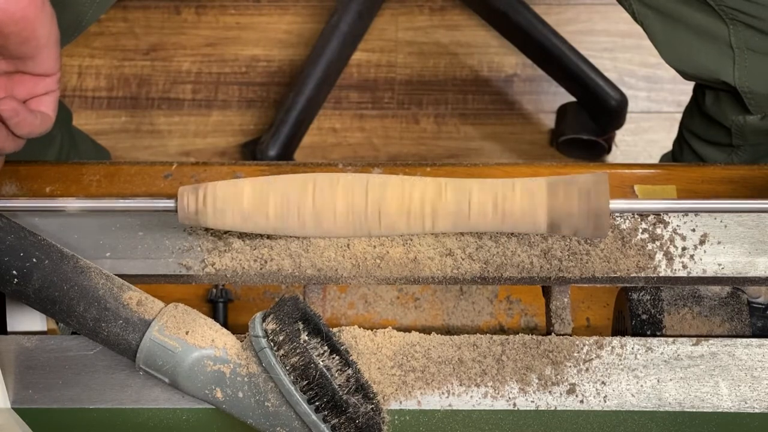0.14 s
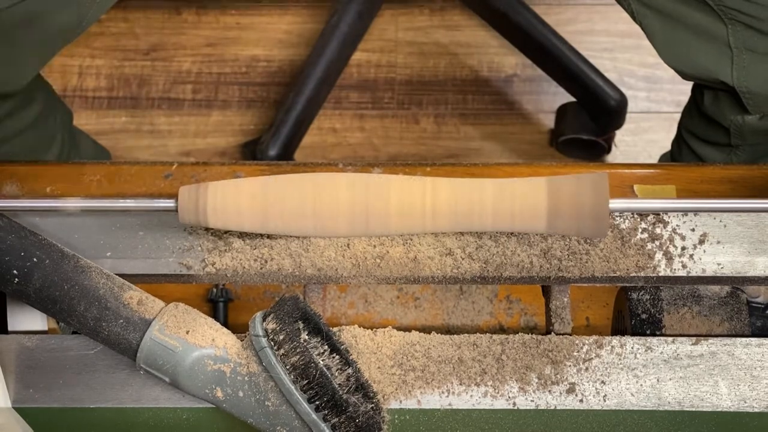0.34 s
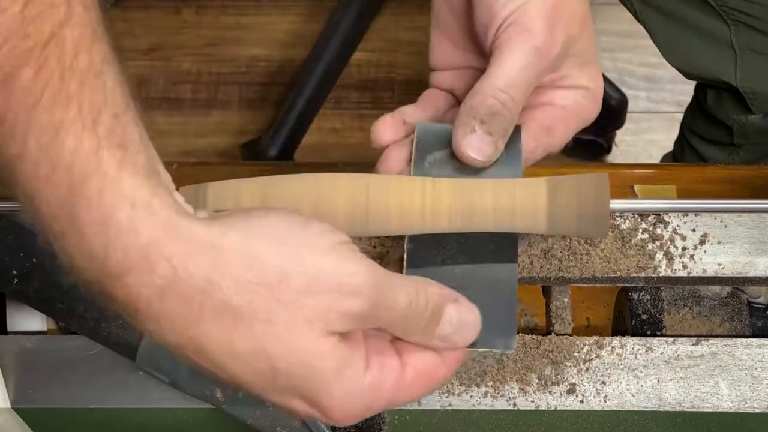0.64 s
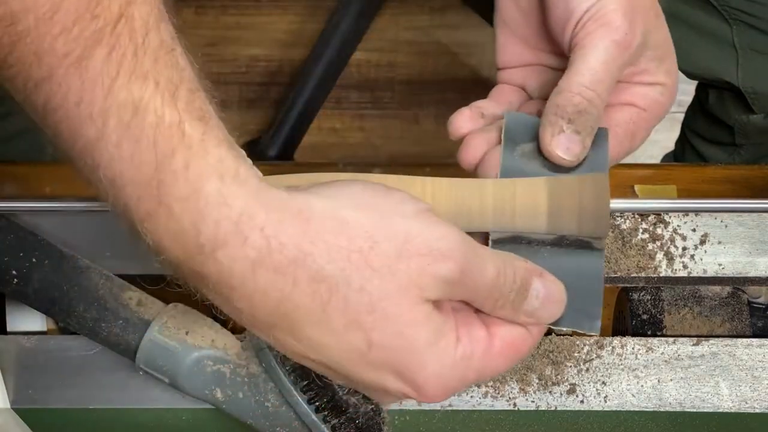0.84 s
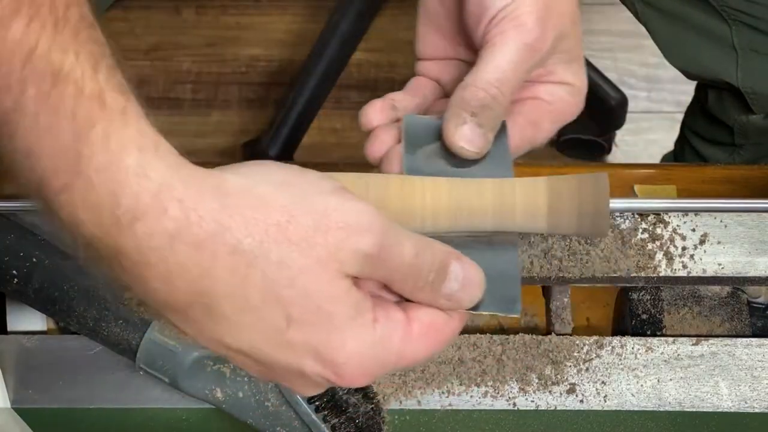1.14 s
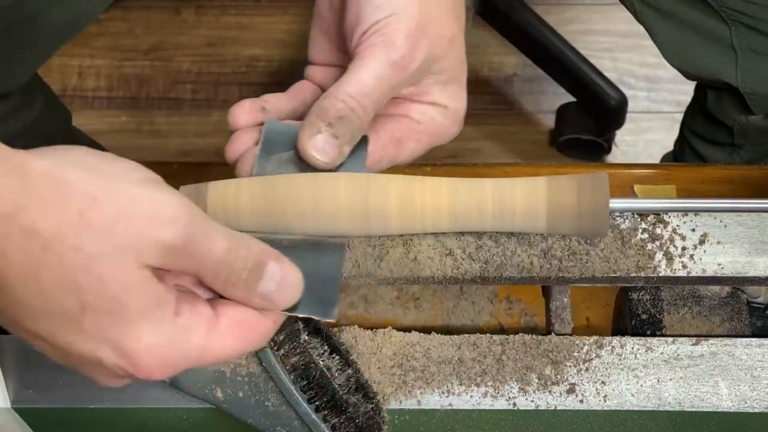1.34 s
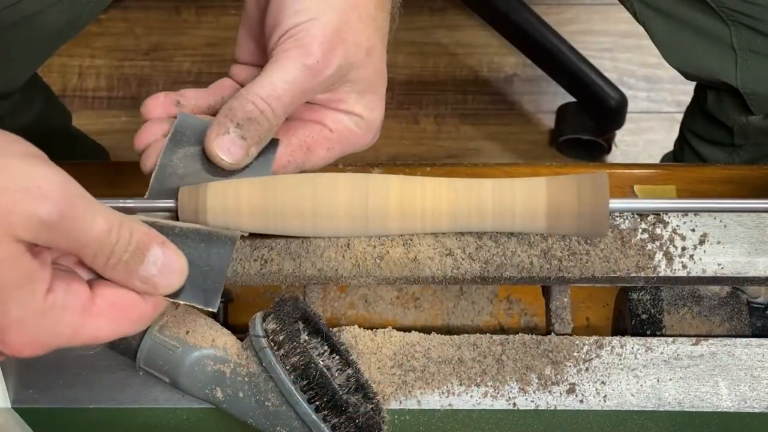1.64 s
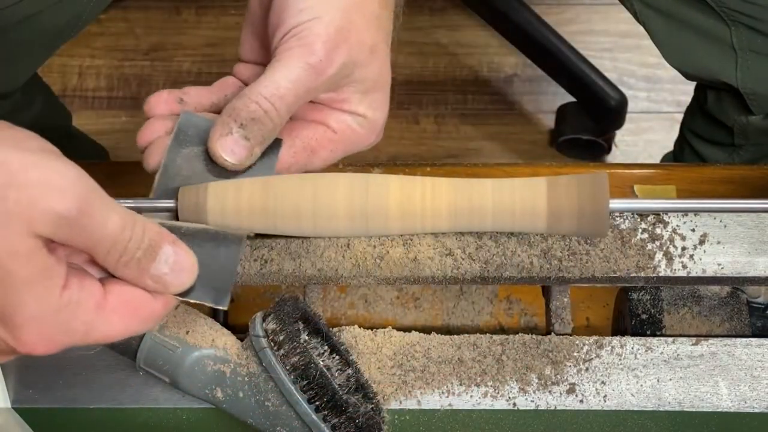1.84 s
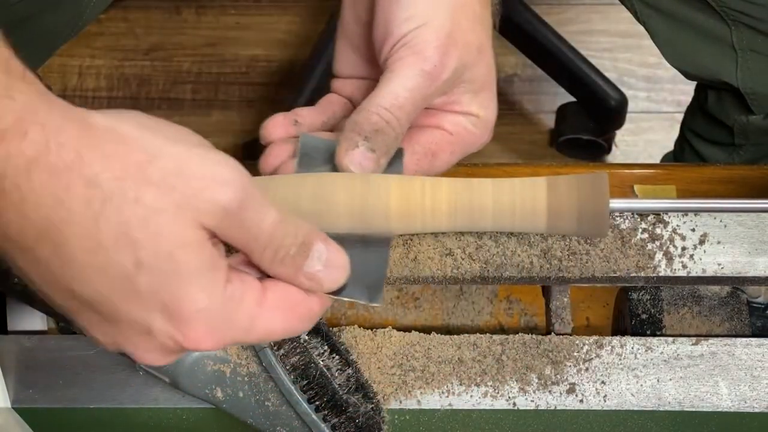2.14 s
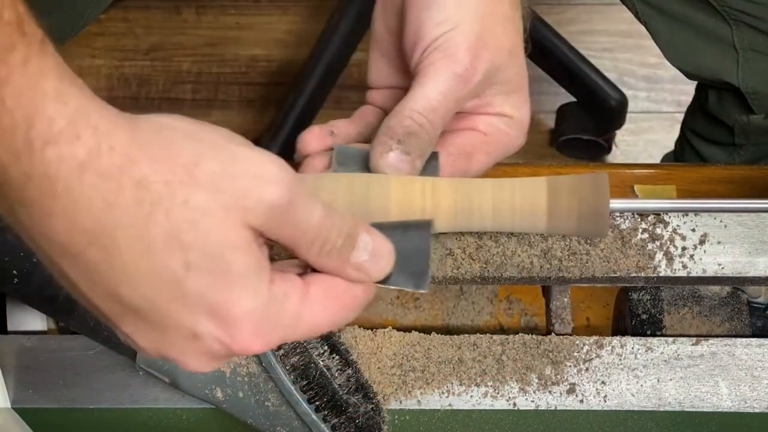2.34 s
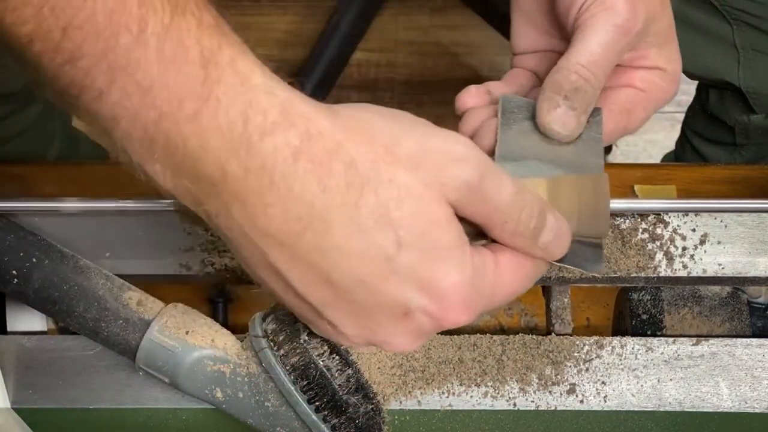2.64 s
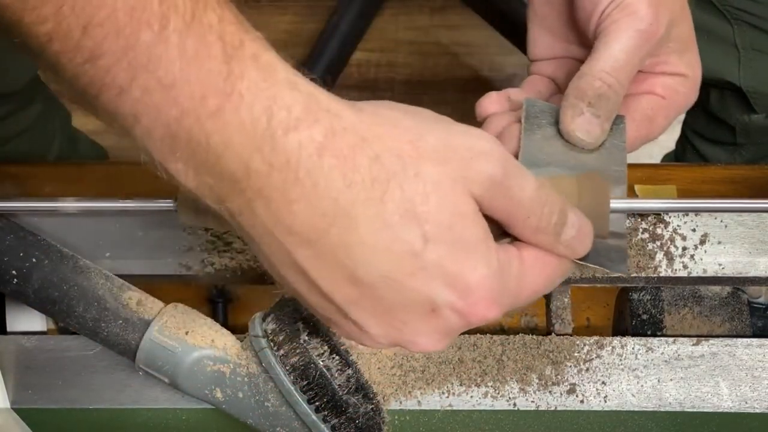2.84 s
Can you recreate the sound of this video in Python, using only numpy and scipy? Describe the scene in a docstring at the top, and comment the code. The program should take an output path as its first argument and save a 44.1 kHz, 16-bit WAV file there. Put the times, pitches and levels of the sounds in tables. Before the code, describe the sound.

A small lathe clunks on and whirs steadily, then sandpaper hisses on the spinning cork

```python
"""A small bench lathe runs in a quiet workshop: noise and bearing knocks ring its metal body.
A clunk of the switch starts it and it spins up in about a tenth of a second.
The motor adds a sine hum that dips in pitch, a shaft rumble and a thin whine of narrow noise.
Two wavering sine tones sing from the drive.
Sandpaper on the spinning cork hisses as shaped noise, close to a two-port microphone."""
import sys
import numpy as np
from scipy import signal
from scipy.fft import rfft, irfft
from scipy.io import wavfile
from scipy.ndimage import map_coordinates

SR = 44100
rng = np.random.default_rng(int(sys.argv[2]) if len(sys.argv) > 2 else 0)


def inscribe(sig):
    """Save sig as 16-bit PCM at rate SR to the path in sys.argv[1].

    A 1-D sig is mono; a 2-D sig holds one channel per row.
    Samples are clipped to [-1, 1] before scaling.
    """
    pcm = np.round(np.clip(np.atleast_2d(sig).T, -1, 1) * 32767)
    wavfile.write(sys.argv[1], SR, pcm.astype(np.int16))


N = 132300  # three seconds

# Still room, spectrum shape: pitch_hz, level_db (per Hz)
ROOM_SPECTRUM = [(30, -21), (150, -15), (500, -8.5), (1000, -31), (4000, -38), (15000, -59)]
ROOM_DB = -75

# Knocks of switch and drive: start_s, thud_db, crack_db, pitch_hz
SWITCH_KNOCKS = [(.0956, -26.5, -63, 490), (.1146, -7, -26.5, 463), (.1229, -32, -30.5, 523),
                 (.1555, -17.5, -70, 360), (.1635, -22, -70, 340), (.169, -16.5, -58, 590),
                 (.1905, -14, -60, 560), (.2015, -16.5, -54, 666), (.2095, -14.5, -50, 610),
                 (.3025, -19.5, -42, 490), (.329, -33, -60, 524)]
# Ringing modes of the housing: pitch_hz, level_db (relative), t60_s
HOUSING_MODES = [(365.5, -3, 0.054), (456, 12.5, 0.015), (570, -2.5, 0.027), (850, 10, 0.034)]
# Snap of the switch, spectrum shape: pitch_hz, level_db (per Hz)
CRACK_SPECTRUM = [(40, -5), (200, 13.5), (600, 3), (1300, -6), (2200, -10.5), (5500, -15.5), (8000, -10.5),
                  (11000, -14), (15500, -49)]
PUSH_S, SNAP_S = .0034, 0.00086  # rise times of thud and crack
CRACK_T60_S, TAIL_DB, TAIL_T60_S = 0.034, -15, 0.28
THUD_LOW_HZ, THUD_HIGH_HZ = 275, 690  # the housing radiates only this band
FOCUS_DB = 49  # loss of a housing mode an octave from the pitch of a knock

START_S, SPIN_UP_S = .135, .115
BEARING_HZ, BEARING_WANDER = 140.94, .014  # rate at full speed, wander as a share of it
KNOCK_SHARE, GATE_DEPTH = 0.26, 0.25  # knocks against noise, swell of the noise per knock
SHAKE_HZ = 36  # throb of the body at full speed
# Body resonances: pitch_hz, width_hz (each pass), level_db (relative), throb_depth (0-1),
# side_db (relative to mid), pan_db (left minus right)
BODY_RESONANCES = [(57.5, 46, -11, 0.2, -22, -2.5), (126.6, 40, -9, 0.55, -17, -1.5),
                   (269, 96, -9.5, 0.25, -21, -4.5), (529.6, 62, -5, 0, -15.5, -2),
                   (617, 123, -3.5, 0.06, -16, -1.5), (852.5, 147, -7.5, 0, -9.5, -5),
                   (1025, 85, -9.5, 0.02, -6.5, 0), (1115, 124, -4, 0.2, -3.5, 7.5),
                   (1521.4, 136, -9, 0.55, -2, -11), (1670, 203, -5.5, 0, -13.5, 2),
                   (2174, 80, -13.5, 0.34, -30, 0.5), (2394, 204, -3.5, 0.02, -40, 0),
                   (2528, 104, -11.5, 0, -27, 0.5), (2826, 140, -18, 0, -38, 1),
                   (3024, 136, -17, 0.2, -33, -1.5)]
# Broad rattle of the running lathe, spectrum shape: pitch_hz, level_db (per Hz)
RATTLE_SPECTRUM = [(25, -21), (100, -1), (170, 0), (350, -3), (750, -13), (1000, -3), (1300, -23.5),
                   (2000, -17), (2700, -18), (3300, -19.5), (3900, -24), (5300, -23.5), (6700, -25.5),
                   (8000, -23), (8300, -43), (9600, -21), (12500, -38), (15500, -48)]
BODY_DB, RATTLE_DB = -40, -39.5
# The run-up wakes ever higher resonances
REACH_HZ, REACH_POWER, REACH_ORDER = 3470, 2.3, 4.6
# Slight level drift of the lathe under the paper: time_s, level_db
LOAD_DRIFT = [(.6, 0), (.9, 0), (1.3, 0.35), (2.0, .5), (2.499, 0.26), (3.0, -0.4)]

# Course of the hum: time_s, pitch_hz
HUM_PITCH = [(.22, 163.7), (.26, 162.6), (.315, 130), (.37, 162.4), (.5, 164.2), (.54, 131), (.59, 130),
             (.64, 154.4), (.69, 135.3), (.77, 164.3), (.99, 164.1), (1.03, 147.3), (1.1, 171),
             (1.16, 168.3), (1.22, 156.8), (1.391, 163), (1.68, 164.1), (1.73, 146.8), (1.77, 162.6),
             (2.02, 161), (2.1, 167.9), (2.18, 156), (2.23, 134.5), (2.29, 164), (2.359, 146.7),
             (2.42, 164.3), (2.51, 165), (2.59, 148), (2.639, 166.7), (2.89, 160.7), (2.95, 134),
             (3.0, 156)]
HUM_DB, HUM_DB_PER_HZ, HUM_FLUTTER_DB = -41, 0.06, 0.96
HUM_WANDER, HUM_THROB = 0.0099, .1  # share of pitch, share of loudness
SHAFT_HZ, SHAFT_DB, SHAFT_SWELL_S = 29.18, -49.5, 0.2
# Whine of the motor: pitch_hz, width_hz (each pass), level_db
WHINE_BANDS = [(5300, 310, -61), (7630, 1500, -56.5), (8040, 25, -60)]
LEAN_DB = -2  # left minus right: the low end sits a little to the right

# Two strands that the drive sings: time_s, low_hz, low_db, high_hz, high_db
SINGING_STRANDS = [(0.299, 1090, -62, 1542, -58), (0.601, 1102, -50, 1530, -48),
                   (.95, 1087, -51.5, 1516, -50.5), (1.281, 1090, -47, 1515, -47),
                   (1.421, 1132, -47.5, 1488, -53), (1.751, 1123, -46, 1505, -47),
                   (2.351, 1079, -45.5, 1506, -60), (2.478, 1142, -42.5, 1512, -48),
                   (2.6, 1087, -48, 1492, -52), (2.75, 1120, -46, 1520, -45.5), (3.0, 1080, -50, 1530, -52)]
STRAND_WANDER, STRAND_FLUTTER_DB = .007, 1.5
STRAND_PAN_DB = -0.5  # left minus right

# Paper on the cork: time_s, fine_hiss_db, coarse_rasp_db
PAPER_PRESS = [(.2, -108, -107), (.62, -57, -69), (.64, -52, -46.5), (.77, -43.5, -43.5),
               (0.901, -43, -47.5), (1.04, -45, -50), (1.12, -42.5, -42.5), (1.199, -41.5, -47.5),
               (1.42, -43, -45), (1.73, -50.5, -55), (1.78, -41.5, -47), (1.86, -49, -52.5),
               (1.96, -44, -46.5), (2.2, -47, -51), (2.43, -49, -49.5), (2.541, -46, -46.5),
               (2.75, -47, -50), (3.0, -49, -48.5)]
# Hiss of the fine grit, spectrum shape: pitch_hz, level_db (per Hz)
FINE_SPECTRUM = [(3000, -34.5), (6500, -26), (8050, 1), (8250, -17.5), (8800, -4.5), (9500, -2),
                 (11000, -11), (12300, -20), (13200, -40), (15500, -16)]
# Rasp of the coarse grit, spectrum shape: pitch_hz, level_db (per Hz)
COARSE_SPECTRUM = [(800, -5), (2000, -8), (3800, -1.5), (5200, -5.5), (5900, -1), (7000, -2.5), (8000, 6),
                   (8250, -18), (10000, 1), (13000, -19)]
GRAIN_DB, GRIT_FLICKER_DB, GRIT_THROB = 1.5, 1, 0.1
# Resonances of the paper strip: time_s, low_hz, low_db, mid_hz, mid_db, top_db
PAPER_RESONANCES = [(.2, 4576, -125, 6700, -125, -125), (.6, 4570, -90, 6700, -90, -95),
                    (.66, 4590, -65, 6800, -56.5, -72), (0.779, 4900, -60, 6950, -48, -64),
                    (1.05, 4700, -66, 6950, -49.5, -68), (1.28, 4480, -55, 7250, -52, -55),
                    (1.46, 5300, -53.5, 7350, -56, -58), (1.65, 5212, -59, 7300, -52, -55),
                    (1.85, 5000, -58, 7200, -59, -58), (1.98, 4850, -53.5, 7200, -66, -54),
                    (2.35, 5230, -58, 7000, -55, -56), (2.599, 5660, -59, 7000, -49, -68),
                    (3.0, 5460, -73, 6900, -55.5, -74)]
SCRAPE_WIDTH_HZ, SCRAPE_TOP_HZ = 880, 10950

# Difference between the microphone ports: pitch_hz, side_minus_mid_db
PORT_DIFFERENCE = [(60, -19), (700, -15), (1300, 0), (2100, -18), (3800, -25), (5000, -6), (7200, -18),
                   (7900, -10), (8300, 13.5), (9500, 6), (10800, -16), (12000, 0), (13200, 3), (15000, 4)]
DIFFUSE_DB = -17  # share that arrives off the bench and walls, unlike on the two sides
TOP_HZ = 15750


def undb(db):
    """Decibels to gain."""
    return 10 ** (np.asarray(db) / 20)


def unit(x):
    """Scale to rms 1."""
    return x / np.sqrt(np.mean(x ** 2))


def follow(t, table):
    """Each column after the time column as a course of straight lines in time."""
    at, *columns = np.array(table, float).T
    return [np.interp(t, at, column) for column in columns]


def curve(points):
    """Gain on every frequency bin, drawn through (Hz, dB) points on a log pitch scale."""
    hz, db = np.array(points, float).T
    bins_hz = np.arange(N // 2 + 1) * SR / N
    return undb(np.interp(np.log(bins_hz + 1), np.log(hz), db))


def colour(x, points):
    """Give a sound a spectrum, at rms 1."""
    return unit(irfft(rfft(x) * curve(points), N))


def ring(x, hz, width_hz):
    """A steep resonance from two passes of one peak filter, at rms 1."""
    b, a = signal.iirpeak(hz, hz / width_hz, fs=SR)
    once = signal.lfilter(b, a, x)
    return unit(signal.lfilter(b, a, once))


def walk(rate):
    """Smooth random course of rms 1 through `rate` random points a second."""
    knots = rng.standard_normal(1024)
    return unit(map_coordinates(knots, [np.arange(N) / SR * rate], order=3, mode="wrap"))


def wave(hz):
    """A sine that follows a moving pitch."""
    return np.sin(2 * np.pi * np.cumsum(hz) / SR)


def glide(hz):
    """Noise in a moving resonance: slow noise carried up to the pitch, at rms 1."""
    lowpass = signal.butter(2, SCRAPE_WIDTH_HZ / 2, fs=SR, output="sos")
    low = signal.sosfilt(lowpass, rng.standard_normal((2, N)))
    phase = 2 * np.pi * np.cumsum(hz) / SR
    return unit(low[0] * np.cos(phase) + low[1] * np.sin(phase))


def ports(x):
    """Two ports hear a sound out of step, opposed in the high treble, plus some scatter off the bench."""
    scatter = rng.standard_normal(1024) * np.exp(-np.arange(1024) / 256)
    diffuse = undb(DIFFUSE_DB) * rfft(scatter / np.linalg.norm(scatter), N)
    # -1j turns the side signal by a quarter cycle
    side = irfft(rfft(x) * curve(PORT_DIFFERENCE) * (diffuse - 1j), N)
    return np.array([x + side, x - side])


def lean(x, pan_db):
    """Place a sound just off centre by a level difference."""
    return x * undb(np.array([[pan_db], [-pan_db]]) / 2)


def still_room():
    """Steady shaped noise of the quiet workshop."""
    return ports(undb(ROOM_DB) * colour(rng.standard_normal(N), ROOM_SPECTRUM))


def switch(t):
    """Switch snap and drive taking up slack: each knock rings the housing and dies away in the room."""
    thud, crack = np.zeros(N), np.zeros(N)
    for start_s, thud_db, crack_db, knock_hz in SWITCH_KNOCKS:
        age = np.maximum(t - start_s, 0)
        rise = lambda seconds: 1 - np.exp(-(age / seconds) ** 2)
        fade = lambda t60: np.exp(-np.log(1000) * age / t60)
        for hz, db, t60 in HOUSING_MODES:
            # modes near the pitch of the knock ring loudest
            focus_db = -FOCUS_DB * np.log2(hz / knock_hz) ** 2
            envelope = undb(thud_db + db + focus_db) * rise(PUSH_S) * fade(t60)
            thud += envelope * np.sin(2 * np.pi * hz * age)
        decay = fade(CRACK_T60_S) + undb(TAIL_DB) * fade(TAIL_T60_S)
        crack += undb(crack_db) * rise(SNAP_S) * decay
    band = signal.butter(3, [THUD_LOW_HZ, THUD_HIGH_HZ], "bandpass", fs=SR, output="sos")
    snap = crack * colour(rng.standard_normal(N), CRACK_SPECTRUM)
    return ports(signal.sosfilt(band, thud) + snap)


def lathe(speed, bearing):
    """Uneven bearing knocks and rolling noise ring the body, which throbs with the drive."""
    # one click of random strength each time the bearing count passes a whole number
    knocks = np.diff(np.floor(bearing), prepend=0) * rng.standard_normal(N)
    gate = 1 + GATE_DEPTH * np.cos(2 * np.pi * bearing)
    shake_hz = SHAKE_HZ * speed * (1 + 0.02 * walk(4.0))
    shake = np.cos(2 * np.pi * np.cumsum(shake_hz) / SR)

    def push():
        return KNOCK_SHARE * unit(knocks) + gate * rng.standard_normal(N)

    out = ports(undb(RATTLE_DB) * colour(push(), RATTLE_SPECTRUM)) * speed ** 2
    for hz, width_hz, db, throb, side_db, pan_db in BODY_RESONANCES:
        mid, side = (ring(push() * (1 + throb * shake), hz, width_hz) for _ in range(2))
        pair = mid + undb(side_db) * side * np.array([[1], [-1]])
        reach = 1 - np.exp(-(REACH_HZ * speed ** REACH_POWER / hz) ** REACH_ORDER)
        out = out + undb(BODY_DB + db) * lean(pair, pan_db) * speed * reach
    return out


def motor(t, speed):
    """A throbbing sine hum that dips now and then, the shaft's rumble and a thin whine of ringing noise."""
    hum_hz, = follow(t, HUM_PITCH)
    shaft = wave(SHAFT_HZ * (1 + 0.07 * walk(9.7)) * speed) * undb(3.7 * walk(5.3))
    # the hum is softer where its pitch is lower
    hum_level_db = HUM_DB_PER_HZ * (hum_hz - hum_hz.mean()) + HUM_FLUTTER_DB * walk(6.2)
    hum = wave(hum_hz * (1 + HUM_WANDER * walk(22.76)) * speed)
    hum = hum * undb(hum_level_db) * (1 + HUM_THROB * shaft)
    swell = np.clip((t - START_S) / SHAFT_SWELL_S, 0, 1)
    rumble = undb(SHAFT_DB) * unit(shaft) * swell
    whine = sum(undb(db) * ring(rng.standard_normal(N), hz, width_hz) for hz, width_hz, db in WHINE_BANDS)
    return (lean(undb(HUM_DB) * unit(hum) + rumble, LEAN_DB) + ports(whine)) * speed ** 4


def singing(t, speed):
    """Two sine tones of the drive, wavering in pitch and loudness."""
    def strand(hz, db):
        tone = unit(wave(hz * speed * (1 + STRAND_WANDER * walk(45))))
        return undb(db + STRAND_FLUTTER_DB * walk(14)) * tone

    low_hz, low_db, high_hz, high_db = follow(t, SINGING_STRANDS)
    low = lean(strand(low_hz, low_db), STRAND_PAN_DB)
    return (low + ports(strand(high_hz, high_db))) * speed ** 4


def sandpaper(press, spectrum, bearing):
    """Countless grit grains scratch the cork: flickering noise that trembles at the bearing-knock rate."""
    grains = rng.standard_normal(N) * undb(GRAIN_DB * walk(300))
    tremble = 1 + GRIT_THROB * np.cos(2 * np.pi * bearing)
    flicker = undb(GRIT_FLICKER_DB * walk(39.9))
    return ports(press * colour(grains * tremble * flicker, spectrum))


def scrape(t):
    """The paper rings in broad bands of noise: two that shift in pitch and a fixed one on top."""
    low_hz, low_db, mid_hz, mid_db, top_db = follow(t, PAPER_RESONANCES)
    low = undb(low_db) * glide(low_hz)
    mid = undb(mid_db) * glide(mid_hz)
    top = undb(top_db) * glide(np.full(N, SCRAPE_TOP_HZ))
    return ports(low + mid + top)


def scene():
    """Switch, spin-up and sanding over the still room."""
    t = np.arange(N) / SR
    # share of full speed
    speed = np.sin(np.pi / 2 * np.clip((t - START_S) / SPIN_UP_S, 0, 1))
    # running count of bearing knocks
    bearing = np.cumsum(BEARING_HZ * speed * (1 + BEARING_WANDER * walk(20))) / SR
    load_db, = follow(t, LOAD_DRIFT)
    fine, coarse = undb(follow(t, PAPER_PRESS))
    machine = undb(load_db) * lathe(speed, bearing) + motor(t, speed) + singing(t, speed)
    grit = sandpaper(fine, FINE_SPECTRUM, bearing) + sandpaper(coarse, COARSE_SPECTRUM, bearing)
    return still_room() + switch(t) + machine + grit + scrape(t)


def record(dry):
    """The recorder cuts the top with a steep low-pass."""
    return signal.sosfilt(signal.ellip(10, .2, 80, TOP_HZ, fs=SR, output="sos"), dry)


dry = scene()
out = record(dry)
inscribe(out)
```